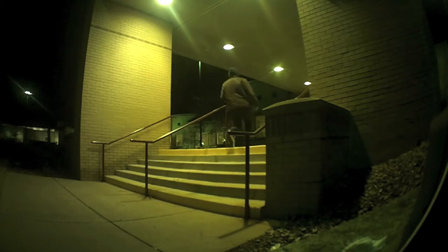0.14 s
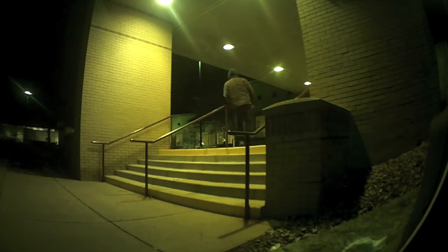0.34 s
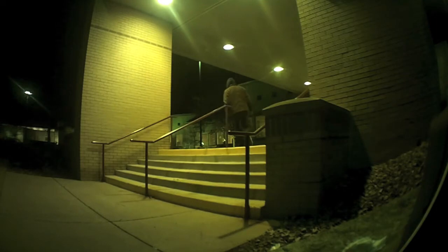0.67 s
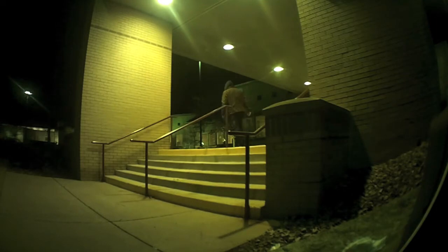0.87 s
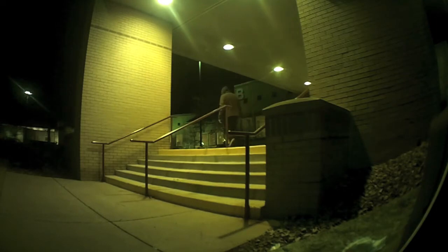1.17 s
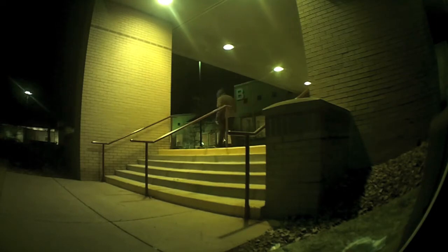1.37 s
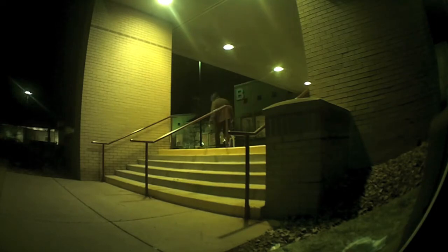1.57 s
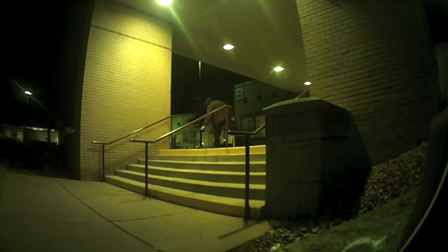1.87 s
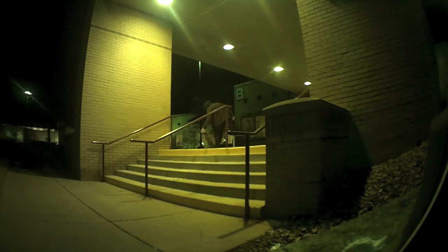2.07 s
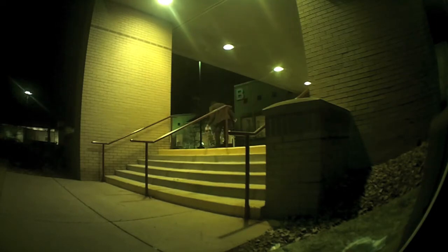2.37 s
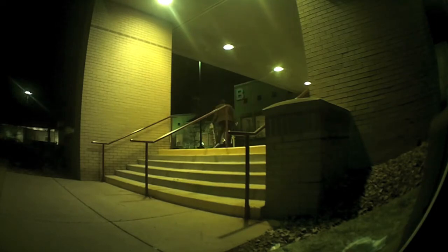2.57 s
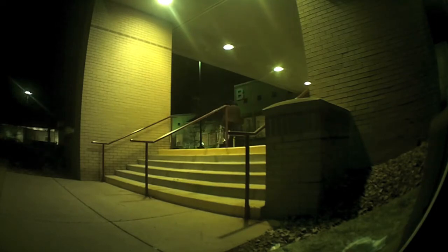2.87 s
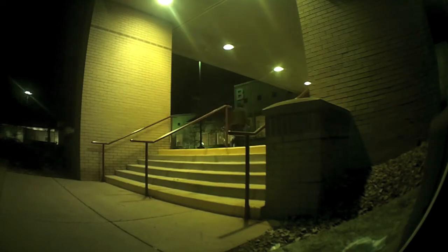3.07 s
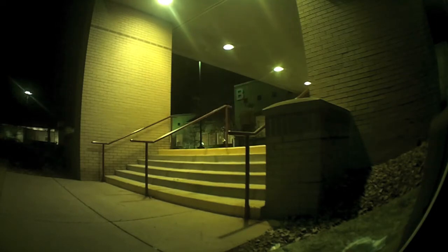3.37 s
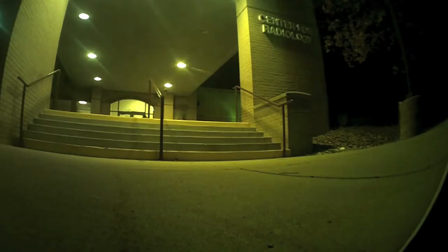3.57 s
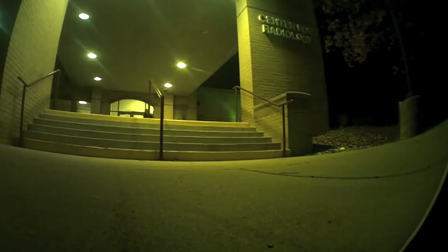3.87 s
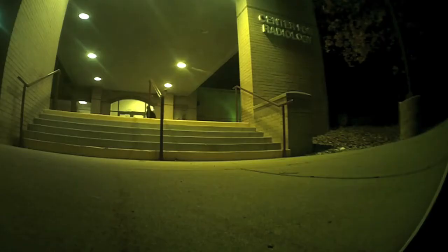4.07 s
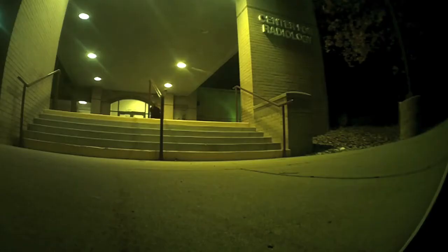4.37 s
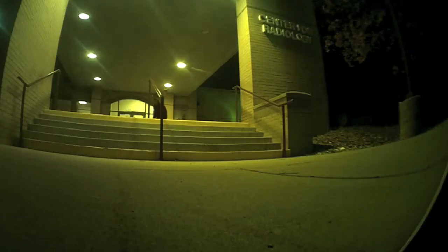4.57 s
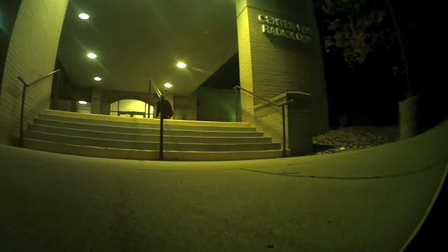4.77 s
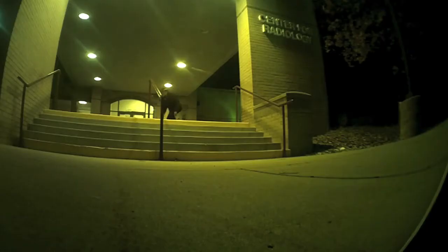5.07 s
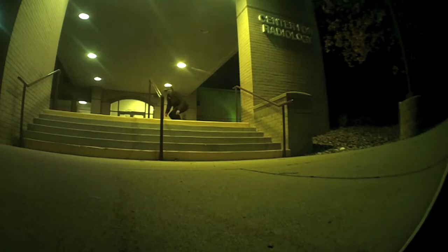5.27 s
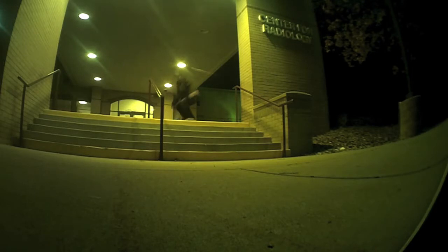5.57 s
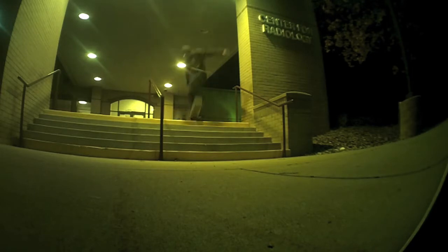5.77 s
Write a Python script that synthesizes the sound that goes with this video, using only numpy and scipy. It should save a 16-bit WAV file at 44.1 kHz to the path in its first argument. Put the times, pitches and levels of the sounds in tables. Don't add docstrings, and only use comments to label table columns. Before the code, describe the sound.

Electric lamp buzz with faint steps and an echoing skateboard slam, then a cut to wheels rolling over concrete joints, ending in a sharp tail pop.

```python
import sys
import numpy as np
from scipy import signal
from scipy.fft import rfft, irfft, next_fast_len
from scipy.io import wavfile
from scipy.ndimage import uniform_filter1d

SR = 44100
rng = np.random.default_rng(int(sys.argv[2]) if len(sys.argv) > 2 else 0)


def makeup_ratio(level_db):
    decades = np.asarray(level_db, float) / 20
    return 10 ** decades


def wrap_up_sound(samples):
    columns = np.atleast_2d(samples).T
    tamed = np.clip(columns, -1, 1)
    steps = np.round(tamed * 32767).astype(np.int16)
    wavfile.write(sys.argv[1], SR, steps)


N = 261513
CHANGE_S = 3.5


def evened(x):
    return x / np.sqrt(np.mean(x ** 2) + 1e-20)


def read(points, hz):
    f, value = np.transpose(points)
    return np.interp(np.log(hz + 1), np.log(f + 1), value)


def curve(rows, order):
    rows = np.array(rows)
    return np.interp(np.arange(N) / SR, rows[:, 0], rows[:, order])


def band(x, lo_hz, hi_hz, kind="bandpass"):
    return signal.sosfilt(signal.butter(3, [lo_hz, hi_hz], kind, fs=SR, output="sos"), x)


def ring(x, hz, width):
    turn = np.exp(2j * np.pi * np.cumsum(hz * np.ones(len(x))) / SR)
    r = np.exp(-np.pi * width / SR)
    return 2 * (turn * signal.lfilter([1 - r], [1, -r], x / turn)).real


def sing(x, hz, width):
    return evened(ring(ring(x, hz, width), hz, 1.9 * width))


def body(x, modes):
    return sum((-1) ** k * makeup_ratio(db) * ring(x, hz, width) for k, (hz, width, db) in enumerate(modes))


def hiss(spectrum, patchy_db, flicker_db):
    frames = N // 128 + 5
    a, b, patches = rng.standard_normal((frames, 257, 3)).T
    patches = evened(uniform_filter1d(uniform_filter1d(patches, size=6, axis=0), size=14, axis=1))
    flicker = evened(uniform_filter1d(rng.standard_normal(frames), size=3))
    z = (a + 1j * b) * makeup_ratio(patchy_db * np.clip(patches, -2, 2) + flicker_db * np.clip(flicker, -2, 2))
    white = signal.istft(z, nperseg=512, noverlap=384)[1][:N]
    colour = makeup_ratio(read(spectrum, np.fft.rfftfreq(N, 1 / SR)))
    return evened(irfft(rfft(white) * colour, N))


def add(mix, s, sound, peak_db):
    part = mix[round(s * SR):][:len(sound)]
    part += makeup_ratio(peak_db) * sound[:len(part)] / abs(sound).max()


def swell(start, length, peak_db, rise_db_s, fall_db_s):
    t = np.arange(N) / SR - start
    return peak_db + rise_db_s * np.minimum(t, 0) - fall_db_s * np.maximum(t - length, 0)


# (pitch [Hz], level [dB per Hz])
NIGHT_COLOUR = [(20, -3.5), (45, 3.5), (110, -1.5), (300, -10), (650, -8.5), (1000, -15.5), (1400, -11.5),
                (2300, -24), (3300, -21), (5000, -11.5), (6500, -13), (7400, -17.5), (9400, -37),
                (15000, -33)]


def night():
    return hiss(NIGHT_COLOUR, patchy_db=1.9, flicker_db=0.4) * makeup_ratio(-48.5)


# (pitch [Hz], level [dB rms])
FAINT_BUZZ = [(600, -66), (1800, -66), (2400, -69), (4500, -77), (6500, -135), (8500, -84.5), (9600, -74.5),
              (14000, -96.5)]


def lamp(lines, mains_hz, faint_db, waver_db):
    multiple = np.arange(5, 250)
    hz = multiple * mains_hz
    chance = rng.random((2, len(multiple)))
    gain = makeup_ratio(read(FAINT_BUZZ, hz) + faint_db - 10 * chance[0] - 9.3 * (multiple % 2))
    strong, strong_db = np.transpose(lines)
    gain[strong.astype(int) - multiple[0]] = makeup_ratio(strong_db) / abs(housing(strong * mains_hz))
    pairs = (multiple + 2 * (multiple > 92)) // 4 * (multiple > 72)
    loose = np.where((multiple < 48) | (multiple > 125), 1, .08)
    turns = pairs / 2 + loose * chance[1]
    turns = turns - .045 * multiple
    phase = np.linspace(0, 1, 8193)
    cycle = np.sqrt(2) * gain @ np.sin(2 * np.pi * (np.outer(multiple, phase) + turns[:, None]))
    buzz = np.interp(np.arange(N) * mains_hz / SR % 1, phase, cycle)
    return buzz * makeup_ratio(waver_db * evened(uniform_filter1d(rng.standard_normal(N), size=4000)))


# (multiple of the mains [count], level [dB rms])
LAMP = [(12, -64.0), (28, -59.2), (50, -60.7), (54, -54.6), (56, -54.8), (58, -62.9), (66, -60.6),
        (68, -53.5), (70, -64.0), (74, -56.6), (78, -54.5), (80, -55.8), (82, -47.8), (84, -49.2)]
# (multiple of the mains [count], level [dB rms])
LAMP_HIGH = [(86, -55.9), (88, -61.8), (90, -65.8), (98, -60.2), (100, -61.6), (102, -65.7), (104, -59.1),
             (106, -56.6), (107, -66.3), (108, -55.2), (110, -61.5), (116, -66.1), (120, -65.6),
             (162, -75.9)]
# (multiple of the mains [count], level [dB rms])
WEAK_LINES = [(6, -67), (8, -67), (62, -71.6), (72, -71.0), (73, -67.4), (76, -73.2), (77, -68.9),
              (99, -67.2), (112, -69.6), (114, -72.4), (118, -72.8), (151, -78.5), (160, -78.1),
              (200, -81.8),
              (29, -77), (30, -72), (32, -74), (34, -81), (35, -74), (36, -74), (37, -78), (38, -78),
                  (40, -76), (43, -87), (44, -75), (46, -85), (47, -82), (51, -87)]


def near_lamp():
    lines = LAMP + LAMP_HIGH + WEAK_LINES
    return lamp(lines, mains_hz=59.9695, faint_db=0, waver_db=0.17)


# (time [s], peak level [dB], pitch [Hz])
STEPS = [
    (0.2, -41.5, 520),
    (0.31, -44, 1290),
    (0.68, -46, 693),
    (0.965, -43, 1315),
]


def steps(pat_s=0.0068):
    out, t = np.zeros(N), np.arange(4000) / SR
    for s, peak_db, hz in STEPS:
        noise = rng.standard_normal(4000)
        add(out, s, ring(noise, hz, 497) * t * np.exp(-t / pat_s), peak_db)
    return out


def scuffs(rows, spectrum):
    rise_db, lift_db_s, fade_db_s = 36, 300, 35
    t, level = np.arange(N) / SR, np.zeros(N)
    for s, rise, length, db in rows:
        swell_db = swell(s + rise, length, db, rise_db / rise, lift_db_s)
        level += makeup_ratio(swell_db - fade_db_s * np.maximum(t - s - rise, 0))
    return hiss(spectrum, patchy_db=1.5, flicker_db=2.2) * level


# (start time [s], rise [s], length [s], peak level [dB])
SCUFF = [
    (1.027, 0.028, 0.29, -60),
]
# (pitch [Hz], level [dB per Hz])
SOLE = [(6000, -30), (8500, -16), (10000, 8), (12000, -9), (15000, -1)]


def shoe_scuff():
    return scuffs(SCUFF, SOLE)


def blows(rows, rise_s, chatter_s, snap, tick_width, spray_s):
    out, fizz, t = np.zeros(N), np.zeros(N), np.arange(4000) / SR
    lead_s = rise_s / 2 - .0009
    rise = np.clip(t / rise_s, 0, 1) ** 2
    after = np.maximum(t - rise_s, 0)
    for s, tick_db, tick_hz, clack_db, clack_hz, fizz_db in rows:
        noise = rng.standard_normal(4000)
        drive = noise * rise * np.exp(-after / chatter_s) + snap * (t == 0)
        spray = noise * rise * np.exp(-after / spray_s) + 5.6 * snap * (t == 0)
        tick = ring(ring(drive, tick_hz, tick_width), tick_hz, 2.0 * tick_width)
        clack = ring(ring(drive, clack_hz, 900), clack_hz, 1800)
        add(out, s - lead_s, band(tick, 910, 7200), tick_db)
        add(out, s - lead_s, band(clack, 500, 2600), clack_db + 6.5)
        add(fizz, s - lead_s, band(ring(spray, 9500, 2500), 8000, 17000), fizz_db + 10.5)
    return out, fizz


def struck(rows):
    return [(s, tick_db, hz, clack_db, 1116, fizz_db) for s, clack_db, tick_db, hz, fizz_db in rows]


# (time [s], clack level [dB], tick level [dB], tick pitch [Hz], fizz level [dB])
KNOCKS = [
    (2.03, -33, -34, 5200, -50),
    (2.0392, -33, -21, 4070, -50),
    (2.1596, -36, -15, 3300, -42),
    (2.1697, -29, -17, 4500, -44),
    (2.1824, -47, -26, 4100, -54),
    (2.1883, -25, -33, 4050, -51),
    (2.34, -25, -44, 4933, -48),
    (2.3498, -25, -35, 4840, -47),
    (5.8414, -15, -11, 3450, -58),
    (5.8512, -31, -24, 3300, -47),
]


def knocks():
    return blows(struck(KNOCKS), rise_s=0.000068, chatter_s=0.0018, snap=5.2, tick_width=1170, spray_s=0.004)


# (pitch [Hz], time to die by 60 dB [s])
PORCH = [(200, 0.91), (600, 0.59), (1700, 0.45), (4500, 0.24), (12000, 0.42)]


def porch(x, gap_s):
    taps = np.zeros(SR // 2)
    at = np.arange(0, SR // 2 - 20, 20)
    taps[at + rng.integers(0, 20, len(at))] = rng.choice([-1., 1.], len(at))
    taps *= np.clip(np.arange(SR // 2) / (gap_s * SR), 0, 1)
    hz, t, z = signal.stft(taps, SR, nperseg=256)
    tail = signal.istft(z * makeup_ratio(-60 * t / read(PORCH, hz)[:, None]), SR, nperseg=256)[1]
    return signal.fftconvolve(x, tail / np.linalg.norm(tail))[:N]


def thuds(rows, rise_s, ring_s, overtone):
    out, t = np.zeros(N), np.arange(4000) / SR
    for s, peak_db, hz in rows:
        swing = np.sin(2 * np.pi * hz * t) + overtone * np.sin(2 * np.pi * 1.566 * hz * t)
        add(out, s, swing * (1 - np.exp(-t / rise_s)) * np.exp(-t / ring_s), peak_db)
    return out


# (time [s], peak level [dB], pitch [Hz])
DECK_THUDS = [(2.037, -39.5, 320), (2.161, -36.5, 99), (2.161, -24.5, 350), (2.172, -22, 530),
              (2.341, -23.5, 348), (2.351, -22.5, 565), (2.443, -33.5, 294), (3.631, -21.5, 164),
              (3.603, -17, 600), (3.715, -13, 458), (4.188, -19, 594), (4.2895, -11, 310), (4.29, -18, 620),
              (4.319, -15.5, 340), (4.892, -19, 483), (4.894, -14, 228), (5.38, -13, 520),
              (5.479, -15.5, 213), (5.563, -17.5, 349), (5.671, -17, 249), (5.835, -15.5, 311)]


def deck_thuds():
    return thuds(DECK_THUDS, rise_s=0.0038, ring_s=0.0046, overtone=0.45)


def pings(rows, burst_s):
    out, t = np.zeros(N), np.arange(1000) / SR
    for s, peak_db, hz, width in rows:
        noise = rng.standard_normal(1000)
        tone = (1 + 0.83 * noise) * np.sin(2 * np.pi * hz * t) * np.exp(-t / burst_s)
        burst = tone + noise * (t < burst_s)
        add(out, s, ring(ring(burst, hz, width), hz, width), peak_db)
    return out


# (time [s], peak level [dB], pitch [Hz],
# width [Hz])
BARE_PARTS = [(2.04, -16.5, 4080, 540), (2.1607, -29, 13000, 7000), (2.1604, -10, 3200, 1500),
              (2.1702, -13, 4800, 980), (2.1883, -24, 4100, 800), (2.183, -21, 3870, 680),
              (5.8423, -10, 3660, 700), (4.2925, -31, 3500, 900), (5.489, -24, 1300, 1400),
              (5.3, -22, 5900, 1000), (6.5, -15, 1520, 1300), (5.8463, -12, 1770, 960),
              (5.8533, -20, 3000, 2500)]


def bare_parts():
    return pings(BARE_PARTS, burst_s=0.00042)


# (time [s], peak level [dB], centre pitch [Hz], width [Hz], time to die by 60 dB [s])
SHUDDERS = [(2.043, -33, 1000, 1400, .1), (2.066, -32, 1100, 1600, 0.16), (2.164, -24.5, 1300, 1500, 0.33),
            (2.186, -40, 1400, 1800, 0.4), (2.344, -27, 900, 1300, 0.18), (2.36, -32, 1200, 1800, 0.1),
            (2.445, -33, 900, 1500, 0.14), (5.843, -40, 9800, 2000, .15), (5.7, -35, 2000, 900, 1),
            (3.53, -28, 1390, 1200, 0.33), (3.616, -20.5, 1390, 1200, 0.22), (3.73, -34, 1600, 1400, 0.23),
            (5.845, -20, 3960, 2500, 0.22), (5.846, -27, 1500, 1600, 0.15)]


def shudders(rise_s=0.0048, grain_db=2.2):
    out, t = np.zeros(N), np.arange(9000) / SR
    for s, peak_db, hz, width, t60 in SHUDDERS:
        noise, grain = rng.standard_normal((2, 9000))
        shake = noise * makeup_ratio(grain_db * evened(uniform_filter1d(grain, size=60)) - 60 * t / t60)
        add(out, s, ring(ring(shake * np.clip(t / rise_s, 0, 1), hz, width), hz, 2 * width), peak_db)
    return out


# (time [s], strength [dB], clack pitch [Hz], brightness [dB])
RATTLES = [(2.058, -41, 1560, 8), (2.0698, -44, 1650, 0), (2.1987, -32, 1000, 1), (2.2195, -37, 1130, 3),
           (2.346, -34, 900, -16), (2.3624, -34, 1450, 3.5), (2.4446, -32, 1130, -10),
           (2.457, -36, 910, -2), (2.468, -50, 1520, -2), (2.5, -46, 1140, 4), (3.5192, -27, 1230, -2.5),
           (3.5375, -28, 1440, -14), (3.624, -32, 1410, -4), (3.735, -36.5, 1900, 15),
           (3.921, -29.5, 1500, -3), (4.207, -34, 1520, -15), (4.226, -28, 1010, -1), (4.249, -28, 1010, 0),
           (4.308, -34, 1080, 0), (4.3497, -41, 1080, 4), (4.775, -30, 1300, -1), (4.83, -28.5, 1110, -5),
           (4.8512, -35, 953, -2), (4.9493, -32, 1010, -3), (5.1, -35.5, 1760, -2), (5.1157, -36, 1800, 5),
           (5.45, -27.5, 1030, -3), (5.4625, -38, 1630, 0), (5.834, -23.5, 1000, -20),
           (5.858, -32, 1215, 6), (5.9174, -25.5, 1200, -18)]


def rattles():
    rows = []
    for s, db, hz, bright_db in RATTLES:
        fizz_db = -19.5 if s < CHANGE_S else -34
        rows.append((s, db + bright_db, 4320, db, hz, db + fizz_db))
    return blows(rows, rise_s=0.0032, chatter_s=0.0085, snap=0, tick_width=2050, spray_s=0.0035)


# (time [s], peak level [dB], pitch [Hz])
CRACKS = [
    (2.1596, -17, 3170),
    (4.783, -11, 2050),
    (5.8418, -6.5, 2400),
]


def cracks(cycles=0.61):
    out = np.zeros(N)
    for s, peak_db, hz in CRACKS:
        u = np.arange(200) / SR * hz * 2 * np.pi / cycles
        add(out, s + .0009, band((1 - u) * np.exp(-u), 300, 5000), peak_db)
    return out


# (time [s], peak level [dB], pitch [Hz])
SLAM_RING = [
    (2.1604, -8.5, 1390),
]
# (time [s], peak level [dB], pitch [Hz])
AXLE_RINGS = [
    (2.1735, -26, 1400),
    (2.3565, -27, 894),
    (2.3405, -21, 1000),
    (2.4445, -30, 1110),
    (2.3502, -25.5, 1998),
    (3.7169, -13, 1236),
    (4.2242, -20, 1003),
    (4.783, -21, 1710),
    (5.8425, -14, 983),
]


def axle_rings():
    slam = thuds(SLAM_RING, rise_s=0.0004, ring_s=0.0033, overtone=0.08)
    return thuds(AXLE_RINGS, rise_s=0.0007, ring_s=0.0045, overtone=0.15) + slam


def far_lamp():
    return makeup_ratio(-14) * lamp(LAMP + LAMP_HIGH, mains_hz=60.0, faint_db=7.5, waver_db=0.65)


def grit(per_s, spread_db):
    size = makeup_ratio(spread_db * np.minimum(rng.exponential(1, N), 5)) * rng.choice([-1, 1], N)
    return size * (rng.random(N) < per_s / SR)


# (start time [s], length [s], hum level [dB], boom level [dB])
HOLLOWS = [(3.622, 0.14, -27, -42.5), (3.996, 0.091, -36, -52), (4.187, 0.065, -35.5, -46.5),
           (4.28, 0.19, -40.5, -47.5), (4.79, 0.046, -36.5, -34.5), (4.902, 0.062, -39.5, -34),
           (5.08, 0.091, -38.5, -50), (5.381, 0.057, -35, -40), (5.534, 0.073, -29.5, -35.5),
           (5.7, 0.033, -34, -54), (5.86, 0.095, -48, -47)]


def drumming(floor_db, order):
    rise_db_s, fall_db_s = 248, 140
    lifts = [swell(row[0], row[1], row[order], rise_db_s, fall_db_s) for row in HOLLOWS]
    return makeup_ratio(np.maximum(np.max(lifts, axis=0), floor_db))


def slab():
    drone = 0.72 * np.sin(2 * np.pi * 165 * np.arange(N) / SR)
    hum = 0.91 * sing(grit(600, 1.0), 157.7, 32.5) + drone
    boom = sing(grit(550, 0.81), 91, 26.0)
    return hum * drumming(-47, order=2) + boom * drumming(-51.5, order=3)


# (time [s], rumble level [dB])
LOAD = [(3.5, -41), (3.53, -31.5), (3.63, -23.5), (3.75, -25.5), (3.85, -28.5), (4.01, -29), (4.3, -26),
        (4.66, -33), (4.8, -28.5), (4.93, -25.5), (5.12, -29.5), (5.25, -29), (5.46, -27), (5.58, -27.5),
        (5.66, -24.5), (5.72, -25), (5.93, -32.5)]


def follow(level_db, share, sag_db_s):
    mean_load_db = -29
    slowing_db = sag_db_s * (np.arange(N) / SR - CHANGE_S)
    return makeup_ratio(level_db + share * (curve(LOAD, order=1) - mean_load_db) - slowing_db)


# (pitch [Hz], width [Hz], level [dB])
DECK = [(230, 56, -1), (340, 78, -0.5), (423, 47, 2.5), (525, 93, 2.5), (602, 123, -1), (782, 77, -5.5)]
# (time [s], pitch [Hz], level over the rumble [dB])
SINGING = [(3.5, 500, -8), (3.75, 462, -7), (3.95, 488, -6.5), (4.1, 521, -19), (4.45, 540, -28),
           (4.55, 517, 3), (4.8, 495.6, 0.5), (5.04, 479, 1), (5.2, 421, -10.5), (5.45, 404, -6.5),
           (5.6, 393, -13.5), (5.93, 340, 1)]


def deck():
    shake = grit(1500, 2.62)
    singing = sing(shake, curve(SINGING, order=1), 26.3) * makeup_ratio(curve(SINGING, order=2))
    rumble = evened(band(body(shake, DECK), 105, 1010))
    return (rumble + singing) * makeup_ratio(curve(LOAD, order=1) + 0.5)


# (pitch [Hz], width [Hz], level [dB])
TRUCK = [(1010, 170, -1), (1232, 200, 4), (1450, 530, -0.5), (1797, 204, 0), (2170, 166, -5.5)]


def trucks():
    bumps = uniform_filter1d(uniform_filter1d(rng.standard_normal(N), size=400), size=400)
    shake = evened(band(body(grit(2500, 0.41), TRUCK), 680, 2160))
    return makeup_ratio(1 * evened(bumps)) * shake * follow(-41, share=0.57, sag_db_s=0)


# (pitch [Hz], level [dB per Hz])
WHEEL = [(2000, -56), (2600, 4.5), (3500, 3), (5000, 3.5), (6300, 1), (7500, -13), (8500, -37)]


def wheels():
    spin = makeup_ratio(80 * np.maximum(np.arange(N) / SR - 5.742, 0))
    return hiss(WHEEL, 0.33, 0.66) * follow(-43.5, share=0.27, sag_db_s=3.5) * spin


# (pitch [Hz], level [dB per Hz])
BEARING = [(7000, -40), (8200, -9.5), (9600, 1.5), (11500, -10.5), (15000, -14.5)]


def bearings():
    return hiss(BEARING, 1.2, 1.7) * follow(-57, share=0.18, sag_db_s=0.5)


# (start time [s], length [s], lift [dB])
COARSE = [
    (3.777, 0.23, 3),
    (5.07, 0.15, 2),
]


def rolling():
    edge_db_s = 44
    coarse = makeup_ratio(sum(np.maximum(swell(*row, edge_db_s, edge_db_s), 0) for row in COARSE))
    return slab() + deck() + coarse * (trucks() + wheels() + bearings())


# (time [s], peak level [dB], pitch [Hz], width [Hz])
JOINT_TICKS = [(3.566, -34, 2100, 900), (3.62, -26, 4400, 1200), (3.628, -33, 4900, 1200),
               (3.65, -38, 3170, 703), (3.722, -26.5, 3420, 900), (3.741, -20, 1200, 600),
               (3.738, -29, 2100, 600), (4.189, -28, 3820, 900), (4.21, -35, 4800, 900),
               (4.228, -24, 2010, 696), (4.25, -25, 1700, 800), (4.308, -34, 4550, 1000),
               (4.355, -32, 2080, 700), (4.356, -35, 3600, 800), (4.798, -32, 3300, 700),
               (4.802, -32, 1700, 900), (4.839, -22, 900, 900), (4.842, -38, 3700, 900),
               (4.871, -34, 3400, 900), (4.897, -35, 3500, 900), (4.952, -34, 4230, 1198),
               (4.97, -37, 2100, 700), (5.394, -22, 1730, 1000), (5.452, -31, 3970, 1300),
               (5.464, -31, 3450, 700), (5.48, -35, 4550, 800), (5.481, -33, 3120, 600), (5.5, -35, 4600, 1000),
               (5.501, -33, 1500, 1000), (5.57, -37, 3440, 800), (5.566, -26, 600, 600),
               (5.853, -25, 1320, 900), (5.922, -35, 3450, 800)]


def joint_ticks():
    return pings(JOINT_TICKS, burst_s=0.0018)


# (time [s], clack level [dB], tick level [dB], tick pitch [Hz], fizz level [dB])
JOINTS = [
    (3.6021, -24.5, -20.5, 4830, -50),
    (3.716, -24, -22, 4030, -55),
    (4.1924, -24.5, -20, 3900, -41),
    (4.2902, -28.5, -23, 3600, -47),
    (4.783, -21.5, -25, 3440, -41),
    (4.8952, -26, -28, 3200, -46),
    (5.3717, -21.5, -30, 4290, -43),
    (5.3828, -34, -23.5, 4320, -57),
    (5.4875, -25.5, -32, 3240, -54),
]


def joints():
    return blows(struck(JOINTS), rise_s=.0035, chatter_s=0.0072, snap=0.3, tick_width=2900, spray_s=0.0047)


# (time [s], peak level [dB], pitch [Hz])
DECK_HUMS = [
    (4.187, -16, 628),
    (4.761, -15, 499),
    (4.886, -20, 490),
    (4.943, -21, 480),
    (5.375, -22.5, 557),
    (5.498, -17, 419.5),
]


def deck_hums():
    return thuds(DECK_HUMS, rise_s=0.0027, ring_s=0.011, overtone=0.3)


# (start time [s], rise [s], length [s], peak level [dB])
DRAGS = [
    (5.55, 0.14, 0.1, -56),
    (5.73, 0.024, 0.005, -46),
    (5.79, 0.024, .008, -45),
    (5.832, 0.012, 0.036, -55),
]
# (pitch [Hz], level [dB per Hz])
GRIP = [(2500, -30), (4500, -12), (6500, -10), (9500, -1), (12500, -1), (15000, 0)]


def grip_drags():
    return scuffs(DRAGS, GRIP)


def scene():
    knock, knock_fizz = knocks()
    knock = knock + cracks()
    bare = bare_parts() + joint_ticks()
    joint, joint_fizz = np.add(joints(), rattles())
    weight = deck_thuds() + deck_hums()
    axles = axle_rings()
    wet = makeup_ratio(-20) * bare + makeup_ratio(-8.5) * knock + makeup_ratio(2.5) * knock_fizz
    wet = wet + makeup_ratio(-6.0) * joint + makeup_ratio(-10) * joint_fizz + makeup_ratio(-6) * weight + makeup_ratio(-11) * axles
    board = bare + knock + knock_fizz + joint + joint_fizz + weight + axles
    board = board + shudders() + porch(wet, gap_s=0.0017)
    air = night()
    first = near_lamp() + air
    for _ in range(2):
        first = band(first, 7740, 8230, "bandstop")
    second = far_lamp() + rolling() + air
    place = np.where(np.arange(N) < CHANGE_S * SR, first, second)
    return (place + board + shoe_scuff() + grip_drags() + steps())[None]


# (pitch [Hz], width [Hz])
NOTCHES = [(2707, 580), (5510, 560), (7850, 1320), (10930, 1130)]


def housing(hz):
    leak = .03
    notches = [signal.freqz(*signal.iirnotch(f, f / width, SR), hz, fs=SR)[1] for f, width in NOTCHES]
    return np.prod([leak + (1 - leak) * notch for notch in notches], axis=0)


def roll_off(x):
    return signal.sosfilt(signal.butter(12, 16450, fs=SR, output="sos"), x)


# (time [s], gain [0-1])
FADER = [
    (3.402, 0.99),
    (3.5, 0),
    (3.512, 0.3),
    (3.53, 0.84),
]


def record(dry):
    size = next_fast_len(N + SR // 4)
    hz = np.fft.rfftfreq(size, 1 / SR)
    edge = makeup_ratio(np.clip((15250 - hz) * .12, -34, 0))
    heard = irfft(rfft(dry, size) * housing(hz) * edge, size)[:, :N]
    return roll_off(heard * np.clip(curve(FADER, order=1), 0, 1))


dry = scene()
out = record(dry)
wrap_up_sound(out)
```